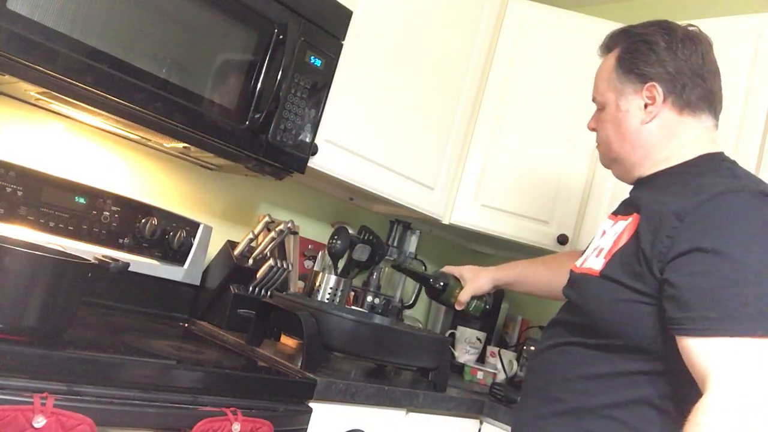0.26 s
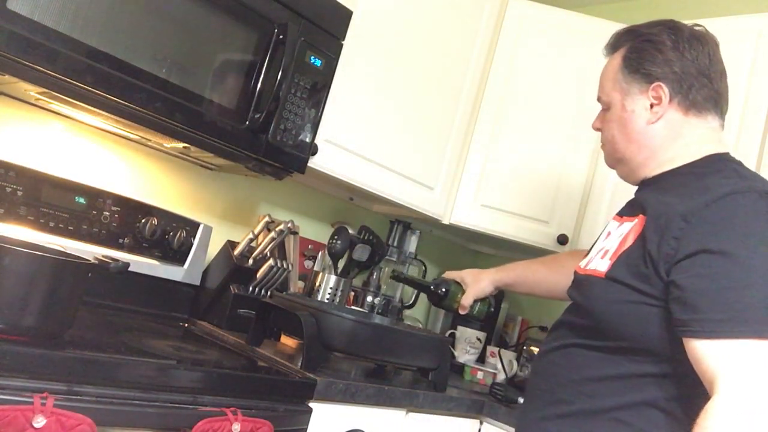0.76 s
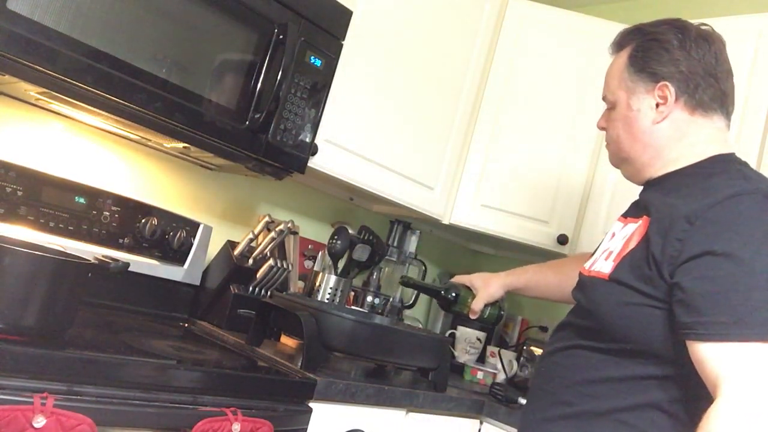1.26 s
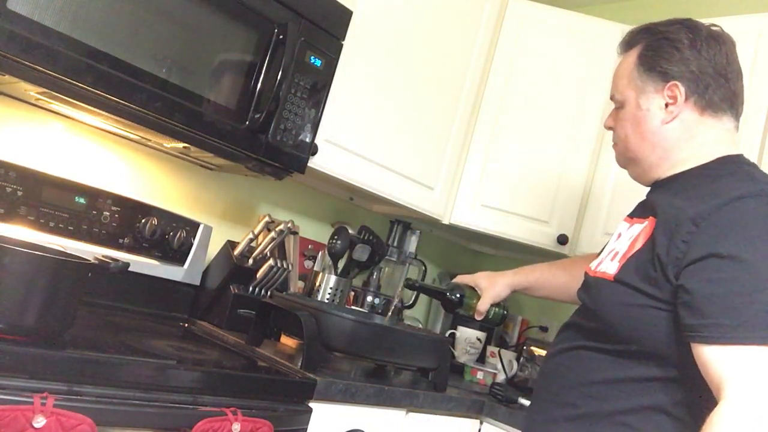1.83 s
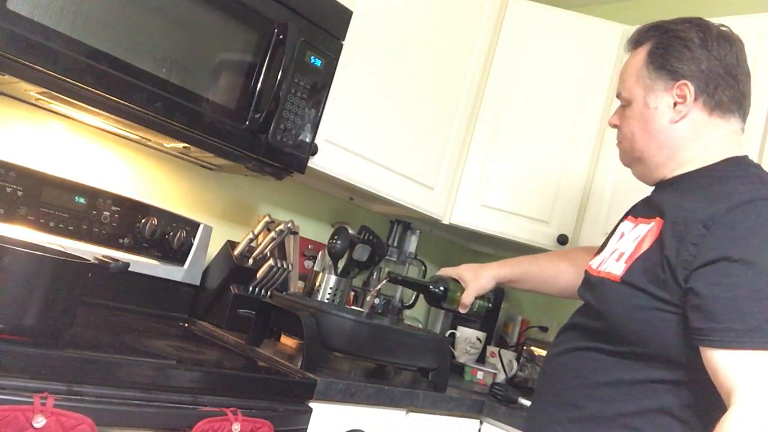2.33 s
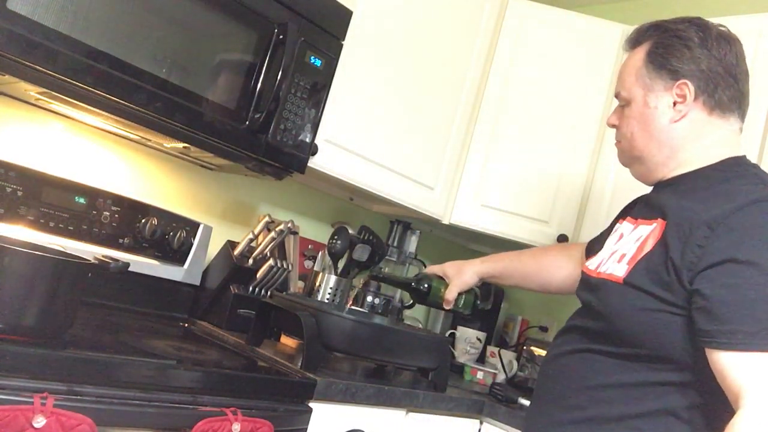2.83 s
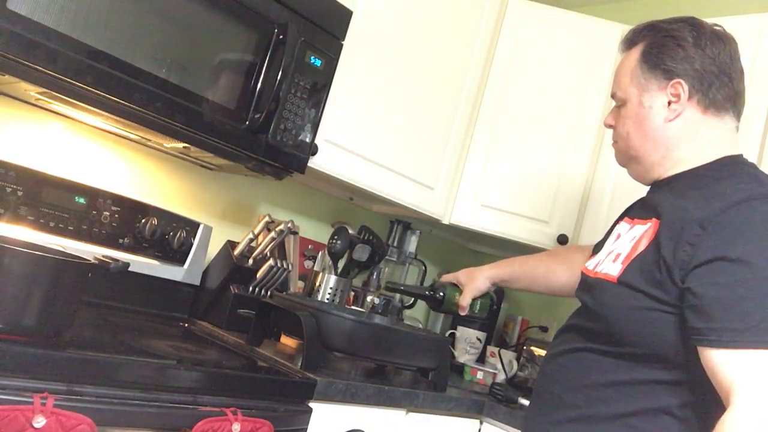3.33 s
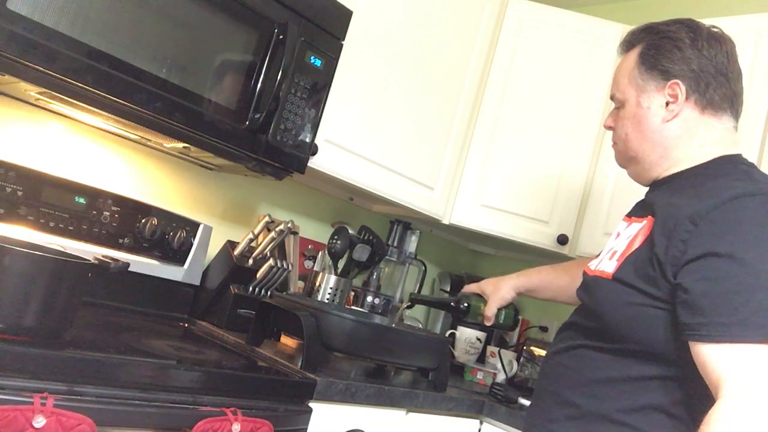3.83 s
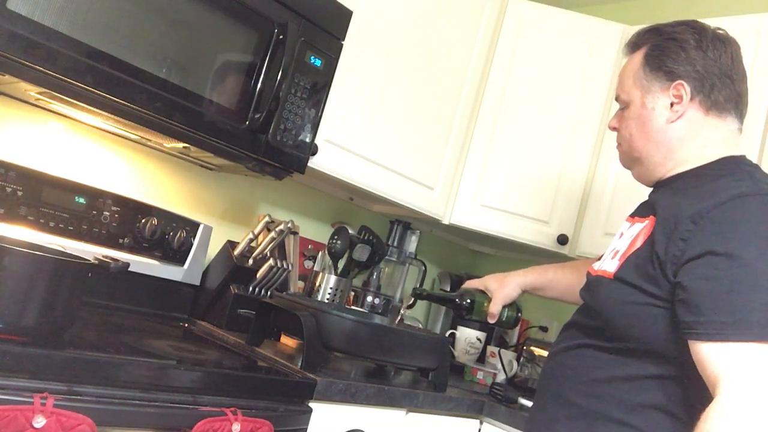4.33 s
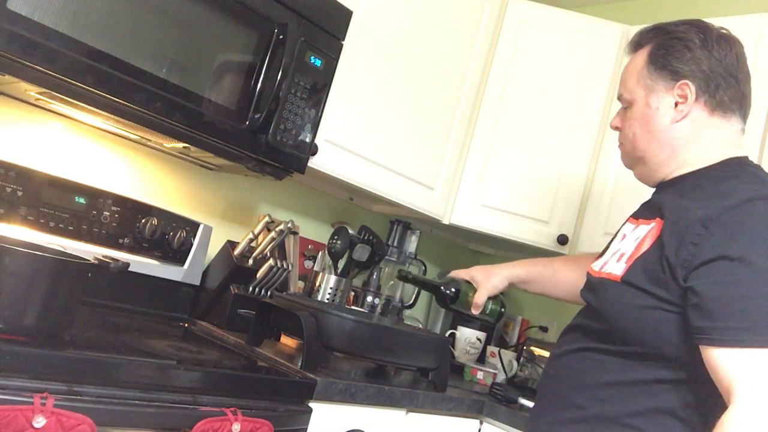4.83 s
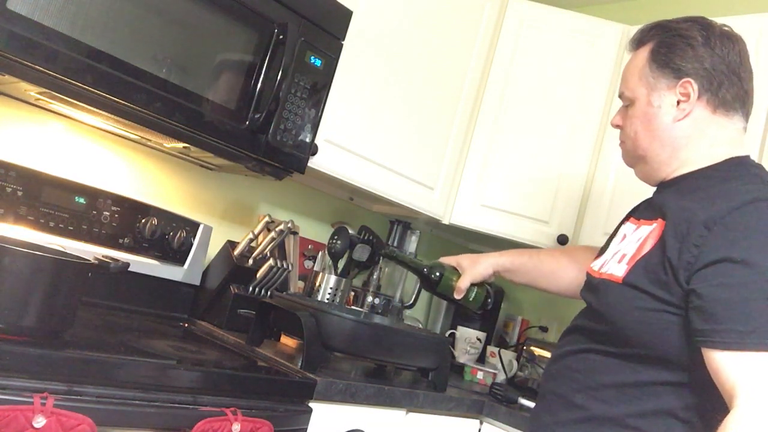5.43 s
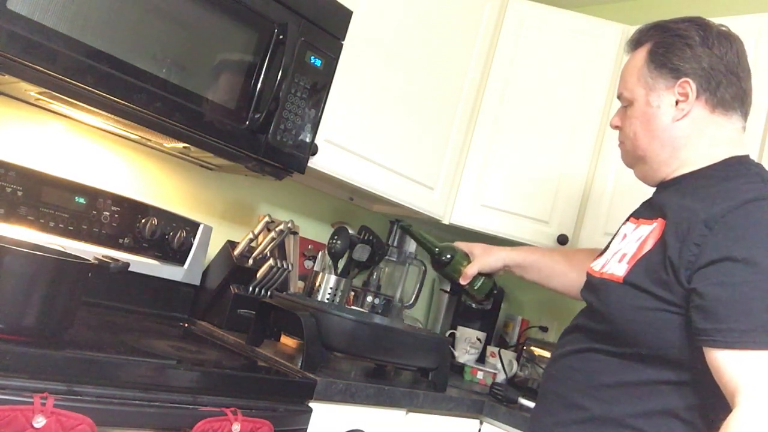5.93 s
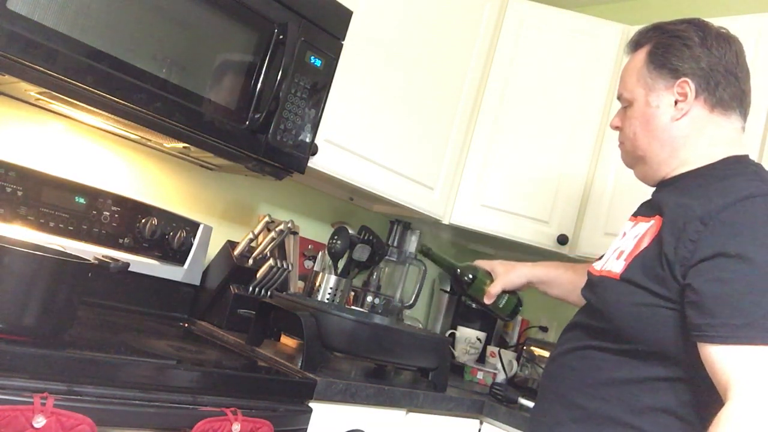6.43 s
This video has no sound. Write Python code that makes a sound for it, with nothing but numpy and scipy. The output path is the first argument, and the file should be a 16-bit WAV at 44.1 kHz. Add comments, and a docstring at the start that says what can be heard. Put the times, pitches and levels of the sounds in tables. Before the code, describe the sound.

Liquid glugging from a glass bottle hits a hot pan and swells into a bubbling sizzle with small spits, in a kitchen.

```python
"""A hot skillet sizzles in a small kitchen as liquid is poured into it from a glass bottle.
The bottle glugs; the stream meets the metal and flashes into a fine hiss, then a dense sizzle of
bursting bubbles, coloured by the pan and its nook under the cupboards, that deepens as the pan fills.
Fat spits and single bubbles plop now and then. One microphone position, near enough to pick out
single drops, with short wall reflections and faint room tone behind; both channels are alike."""
import sys
import numpy as np
from scipy import signal
from scipy.fft import rfft, irfft, next_fast_len
from scipy.io import wavfile

SR = 44100
rng = np.random.default_rng(int(sys.argv[2]) if len(sys.argv) > 2 else 0)


def wav_record(signal):
    """Record a signal, one row per channel, as 16-bit PCM in the file named by sys.argv[1]."""
    frames = np.transpose(np.atleast_2d(signal))
    bounded = np.clip(frames, -1, 1)
    # unit amplitude maps onto the largest positive 16-bit level
    quanta = np.round(bounded * 32767).astype(np.int16)
    wavfile.write(sys.argv[1], SR, quanta)


N = 294147


def from_db(db):
    """Decibels to gain."""
    return 10 ** (np.asarray(db) / 20)


def unit_rms(x):
    """Scale to unit rms."""
    return x / np.sqrt(np.mean(x ** 2) + 1e-20)


def curves(rows):
    """Each column after the time column, interpolated at every sample."""
    time_s, *columns = np.transpose(rows)
    return [np.interp(np.arange(N) / SR, time_s, column) for column in columns]


def drift(rate_hz):
    """Smooth random wander of about unit rms."""
    hop, settle = 40, 2000
    pole = np.exp(-2 * np.pi * hop * rate_hz / SR)
    noise = rng.standard_normal(N // hop + settle + 2)
    slow = signal.lfilter([1], [1, -2 * pole, pole * pole], noise)[settle:]
    return np.interp(np.arange(N) / hop, np.arange(len(slow)), unit_rms(slow))


def band(x, edges_hz, kind, order=2):
    """Butterworth filter."""
    sos = signal.butter(order, np.clip(edges_hz, 10, .45 * SR), kind, fs=SR, output="sos")
    return signal.sosfilt(sos, x + 1e-18)


def colour(x, spectrum, resonances):
    """Causal filter made of a broad spectrum with bell-shaped peaks and dips on top."""
    size = next_fast_len(N + SR // 2, True)
    hz = np.maximum(np.fft.rfftfreq(size, 1 / SR), 1)
    points_hz, points_db = np.transpose(spectrum)
    db = np.interp(np.log(hz), np.log(points_hz), points_db)
    db += sum(gain / (1 + (2 * (hz - centre) / width) ** 2) for centre, width, gain in resonances)
    cepstrum = irfft(np.log(from_db(db)), size)
    cepstrum[1:size // 2] *= 2   # fold to minimum phase
    cepstrum[size // 2 + 1:] = 0
    return irfft(rfft(x, size) * np.exp(rfft(cepstrum)), size)[:N]


def clicks(per_s, spread_db):
    """Impulses at random moments: many small, a few large."""
    sizes = from_db(spread_db * np.minimum(rng.exponential(1, N), 6))
    return sizes * rng.choice([-1, 1], N) * (rng.random(N) < per_s / SR)


def ring(x, hz, t60_s):
    """A resonator: each click sets a decaying sine ringing."""
    decay, angle = from_db(-60 / (t60_s * SR)), 2 * np.pi * hz / SR
    return signal.lfilter([0, np.sin(angle)], [1, -2 * decay * np.cos(angle), decay * decay], x + 1e-18)


def add(out, start_s, sound):
    """Mix a short sound in at start_s."""
    at = max(round(start_s * SR), 0)
    out[at:at + len(sound)] += sound[:N - at]


def pulses(rows, swell_s, rise):
    """Short rounded tones that swell, ring for a few cycles and rise a little in pitch."""
    out, t = np.zeros(N), np.arange(SR // 10) / SR
    envelope = (t / swell_s) ** 2 * np.exp(2 - 2 * t / swell_s)
    for start_s, level_db, pitch_hz in rows:
        tone = np.sin(2 * np.pi * pitch_hz * t * (1 + rise * t))
        add(out, start_s, from_db(level_db) * envelope * tone)
    return out


def kitchen(x, wet_db, t60_s=0.35):
    """The direct sound reaches the microphone first, then duller reflections off cupboards and walls."""
    t = np.arange(SR // 2) / SR
    tail = rng.standard_normal(len(t)) * from_db(-60 * t / t60_s) * (t > .004)
    tail = band(tail / np.sqrt(np.sum(tail ** 2)), 6000, "low", order=1)
    return x + from_db(wet_db) * signal.fftconvolve(x, tail)[:N]


# Spectrum of the kitchen's background: frequency_hz, relative_db
ROOM_SPECTRUM = [(15, -55), (25, -15), (69, -4.5), (129, -8), (160, -4.5), (260, -5), (305, -6),
                 (349, -8.5), (722, -16.5), (1020, -14), (1270, -16.5), (1750, -14.5), (2230, -18),
                 (6050, -18), (15500, -33.5)]
# Low modes of the room: centre_hz, width_hz, gain_db
ROOM_RESONANCES = [(135, 37, -5), (187.5, 8.9, 5.5), (240, 33, 3), (277, 17, 3.5)]


def room_tone(level_db):
    """Steady noise behind everything, droning in the room's low modes."""
    return from_db(level_db) * unit_rms(colour(rng.standard_normal(N), ROOM_SPECTRUM, ROOM_RESONANCES))


# Bumps ahead of the pour: start_s, level_db
TIPPING_BUMPS = [(0.008, -59), (0.1, -56), (0.158, -62), (0.243, -59)]


def bumps(pitch_hz):
    """The bottle tips with faint low bumps, almost dry at the microphone."""
    rows = [(start_s, level_db, pitch_hz) for start_s, level_db in TIPPING_BUMPS]
    return kitchen(pulses(rows, swell_s=0.01, rise=.1), wet_db=-12.0)


# Air gulped into the bottle neck: start_s, level_db
AIR_GULPS = [(0.328, -48), (0.533, -51.5), (0.727, -52), (0.923, -47), (1.129, -48), (1.342, -43.5)]


def glugs(first_hz, climb_hz_per_s):
    """Each gulp knocks in the neck, a little higher than the last, and leaves the cavity ringing."""
    first_s = AIR_GULPS[0][0]
    rows = [(start_s, level_db, first_hz + climb_hz_per_s * (start_s - first_s))
            for start_s, level_db in AIR_GULPS]
    gulps = pulses(rows, swell_s=0.0032, rise=1.1)
    cavity = from_db(-57) * ring(gulps, hz=1007, t60_s=0.63)
    return kitchen(gulps + cavity, wet_db=-0.5)


# Droplets spitting off the hot metal: start_s, level_db, centre_hz
SPITTING_DROPLETS = [(0.031, -47, 7650), (0.461, -55, 11000), (0.623, -47, 4500), (0.797, -47, 10000),
                     (1.034, -41, 12000), (1.225, -47, 12000), (1.385, -43, 10000), (1.868, -38, 9000),
                     (2.655, -33, 10000), (2.827, -36, 9000), (2.862, -42, 12000), (3.585, -39, 11000),
                     (3.615, -40, 12000), (5.025, -47, 13000), (5.454, -39, 11000)]


def spits(rise_s, t60_s):
    """A droplet flashes to steam in a short, bright puff of noise an octave wide."""
    out, t = np.zeros(N), np.arange(SR // 10) / SR
    envelope = np.minimum(t / rise_s, 1) ** 2 * from_db(-60 * t / t60_s)
    for start_s, level_db, centre_hz in SPITTING_DROPLETS:
        steam = band(rng.standard_normal(len(t)), [centre_hz / np.sqrt(2), centre_hz * np.sqrt(2)], "band")
        add(out, start_s - rise_s / 2, from_db(level_db) * envelope * steam)
    return kitchen(out, wet_db=2)


# Bubbles and drops that stand out at the microphone: start_s, level_db, pitch_hz
SINGLE_BUBBLES = [(0.33, -59, 2650), (0.728, -57, 2950), (0.862, -51, 2030), (0.962, -45, 2550),
                  (0.987, -45, 2650), (1.112, -42, 2720), (1.15, -44, 2780), (1.232, -39.5, 2700),
                  (1.245, -43, 3130), (1.32, -39, 2140), (1.395, -40, 2040), (1.48, -40, 2110),
                  (1.738, -39, 1460), (1.752, -37, 2050), (1.812, -40, 1820), (3.548, -34, 2780),
                  (3.975, -32.5, 2040), (4.945, -35, 1700), (4.947, -36, 2020), (6.175, -28.5, 1670)]


def plops():
    """A single bubble or drop rings for an instant, bending up in pitch."""
    return kitchen(pulses(SINGLE_BUBBLES, swell_s=0.0022, rise=1.7), wet_db=0.5)


def crackle(per_s, spread_db, clump_db, spots):
    """Thin films snap in flurries of sharp clicks; each spot on the metal has its own reflections."""
    flurries = (clicks(per_s, spread_db) * from_db(clump_db * drift(9.1)) for _ in range(spots))
    return unit_rms(sum(kitchen(flurry, wet_db=-4) for flurry in flurries))


def bubbles(per_s_at_2khz, ring_cycles, spread_db, clump_db):
    """Steam bubbles of all sizes ring briefly; the small, high ones are the most numerous."""
    sides = np.zeros((2, N))   # each side of the pan has its own reflections
    for k, hz in enumerate(np.geomspace(350, 15500, 40)):
        bursts = clicks(per_s_at_2khz * hz / 2000, spread_db) * from_db(clump_db * drift(16.4))
        ringing = np.gradient(ring(bursts, hz, ring_cycles / hz))
        sides[k % 2] += np.sqrt(hz) * unit_rms(ringing)
    return unit_rms(sum(kitchen(side, wet_db=-3.5) for side in sides))


# Strength of the pool's hollow ring: time_s, relative_db
POOL_RING = [(2.4, -25), (3.4, -2.5), (4.0, -4.5), (4.6, -10), (5.2, -12), (5.85, -8.5), (6.2, 2),
             (6.67, -2.5)]


def pool(simmer, pitch_hz, t60_s):
    """As the pool deepens, its hollow, fluttering ring takes over a share of the simmer."""
    depth = from_db(curves(POOL_RING)[0] - 1.0)
    snaps = crackle(per_s=440, spread_db=3.0, clump_db=3.0, spots=1)
    flutter = from_db(1.8 * drift(28))
    hollow = unit_rms(ring(snaps, pitch_hz, t60_s) * flutter)
    return (simmer + depth * hollow) / np.sqrt(1 + depth ** 2)


def size_classes(x):
    """Part the sound by bubble size into coarse boil, simmer, fizz, spray and mist, each of unit rms."""
    hz = np.fft.rfftfreq(N, 1 / SR)
    below = [1 / (1 + (hz / edge_hz) ** 14) for edge_hz in (100, 1450, 2400, 4800, 9000, 19000)]
    return [unit_rms(irfft(rfft(x) * share, N)) for share in np.diff(below, axis=0)]


# Middle of each size class, coarse boil to mist: centre_hz
CLASS_CENTRES_HZ = [1100, 1900, 3400, 6500, 11500]
# Growth of each class as the liquid spreads: contact_db, full_db, growth_s, growth_power, later_db_per_s
CLASS_GROWTH = [(-71, -49, 2.37, 1.9, -0.01), (-75, -45.5, 2.87, 1.54, 0.64), (-68, -43, 1.84, 1.48, 0),
                (-61, -47, 1.92, 1.74, -0.97), (-63, -53.5, 2.05, 1.8, -0.9)]
# Vigour of the whole boil: time_s, gain_db
BOIL_VIGOUR = [(.8, 1.5), (1.55, 0), (2.1, -0.8), (2.3, 0), (3.35, -0.46), (4.0, 0.5), (4.7, 1.4),
               (5.1, -0.5), (5.7, 0.73), (6.67, .4)]
# The sizzle swells for a while around one pitch: start_s, length_s, swell_db, pitch_hz
SIZZLE_SWELLS = [(.94, 0.092, 2.5, 2650), (1.087, 0.14, 1.5, 3000), (1.288, 0.36, 3, 1700),
                 (1.696, .16, 3, 1500), (2.2, 0.13, 2.5, 5000), (2.41, 0.12, 4.5, 1900),
                 (3.6, 0.36, 2.5, 1210), (3.88, 0.3, 2, 1870), (3.97, 0.35, 2, 11000),
                 (4.213, 0.79, 1.5, 2840), (4.5, 0.34, 1.5, 5500), (5.85, 1, 1.8, 1210)]


def boil_levels(contact_s, swell_width_octaves=0.59):
    """Each class's level in dB grows with the wetted area and lifts with every swell near its pitch."""
    age_s = np.maximum(np.arange(N) / SR - contact_s, 0)
    vigour_db, levels = curves(BOIL_VIGOUR)[0], []
    for centre_hz, growth in zip(CLASS_CENTRES_HZ, CLASS_GROWTH):
        contact_db, full_db, growth_s, growth_power, later_db_per_s = growth
        wetted = np.minimum(age_s / growth_s, 1) ** growth_power
        level_db = 10 * np.log10(from_db(contact_db) ** 2 + wetted * from_db(full_db) ** 2)
        level_db += vigour_db + later_db_per_s * np.maximum(age_s - growth_s, 0)
        for start_s, length_s, swell_db, pitch_hz in SIZZLE_SWELLS:
            nearness = np.exp(-.5 * (np.log2(centre_hz / pitch_hz) / swell_width_octaves) ** 2)
            arch = np.sin(np.linspace(0, np.pi, int(length_s * SR)))
            add(level_db, start_s, swell_db * nearness * arch)
        levels.append(level_db)
    return levels


# Broad colour of the sizzle at the microphone: frequency_hz, relative_db
SIZZLE_SPECTRUM = [(150, -54.5), (250, -14), (499, -17.5), (729, -12), (1030, -8.5), (1160, -4.5),
                   (1290, -3.5), (1700, -1.5), (1890, -2.5), (4030, -3.5), (4790, -5.5), (5890, -4.5),
                   (15500, -22)]
# Peaks and hollows of the pan and its nook under the cupboards: centre_hz, width_hz, gain_db
NOOK_RESONANCES = [(594, 58, 6), (741, 22, 8), (789, 16, 9.5), (815, 27, -8), (882, 15, 7), (927, 22, 8.5),
                   (992, 35, 2), (1111, 35, 5.5), (1207, 27, 7), (1285, 130, -4), (1389, 25, 9),
                   (1540, 135, -3), (1697, 47, 0.5), (2108, 25, 8.5), (2353, 59, 5), (3080, 62, 2.5),
                   (2630, 74, 2.5), (3250, 45, -3), (3630, 28, -0.5), (4430, 360, 0), (4820, 136, -6),
                   (5100, 220, 1.5), (6900, 160, 3), (7470, 1400, -1.5), (8500, 1000, 0.5), (9430, 250, 2),
                   (10440, 810, -6.5)]


def sizzle(contact_s, onset_s):
    """The stream meets hot metal: bubbles and crackle fill the nook, each size swelling at its own pace."""
    ringing = bubbles(per_s_at_2khz=450, ring_cycles=14.2, spread_db=2.5, clump_db=1.7)
    snapping = from_db(-2.0) * crackle(per_s=4200, spread_db=1.5, clump_db=1.4, spots=2)
    in_nook = colour(ringing + snapping, SIZZLE_SPECTRUM, NOOK_RESONANCES)
    coarse, simmer, fizz, spray, mist = size_classes(in_nook)
    simmer = pool(simmer, pitch_hz=1706, t60_s=0.033)
    coarse_db, simmer_db, fizz_db, spray_db, mist_db = boil_levels(contact_s)
    body = from_db(coarse_db) * coarse + from_db(simmer_db) * simmer + from_db(fizz_db) * fizz
    hiss = from_db(spray_db) * spray + from_db(mist_db) * mist
    puffs = from_db(0.81 * drift(37))
    onset = np.clip((np.arange(N) / SR - contact_s) / onset_s, 0, 1)
    return onset * (body + puffs * hiss)


def scene():
    """Pan, bottle and room, heard from one point in the kitchen."""
    drops = plops()
    bottle = bumps(pitch_hz=258) + glugs(first_hz=1056, climb_hz_per_s=44)
    pan = sizzle(contact_s=0.77, onset_s=0.027) + drops + spits(rise_s=0.0098, t60_s=0.077)
    mono = pan + bottle + room_tone(level_db=-61)
    return np.array([mono, mono])


def record(dry):
    """The microphone loses the deepest bass; the top is cut steeply."""
    low_cut_hz, high_cut_hz = 33, 15750
    thinned = band(dry, low_cut_hz, "high", order=3)
    return signal.sosfilt(signal.ellip(12, .1, 70, high_cut_hz, fs=SR, output="sos"), thinned)


dry = scene()
out = record(dry)
wav_record(out)
```